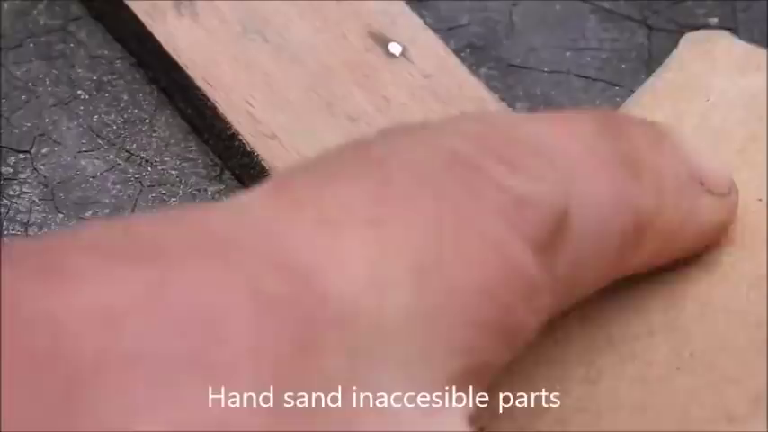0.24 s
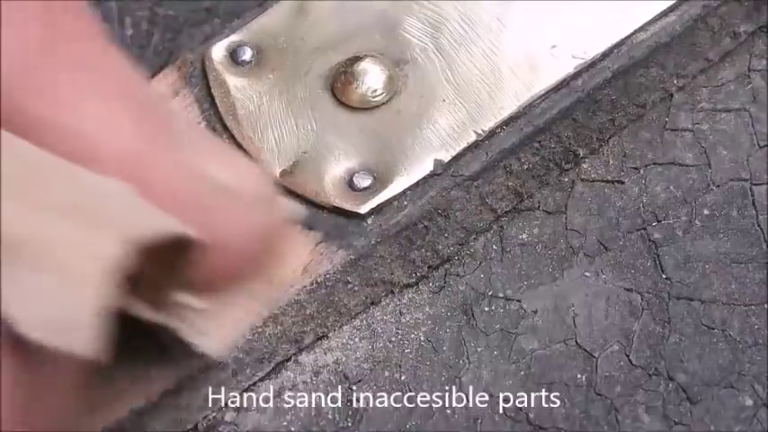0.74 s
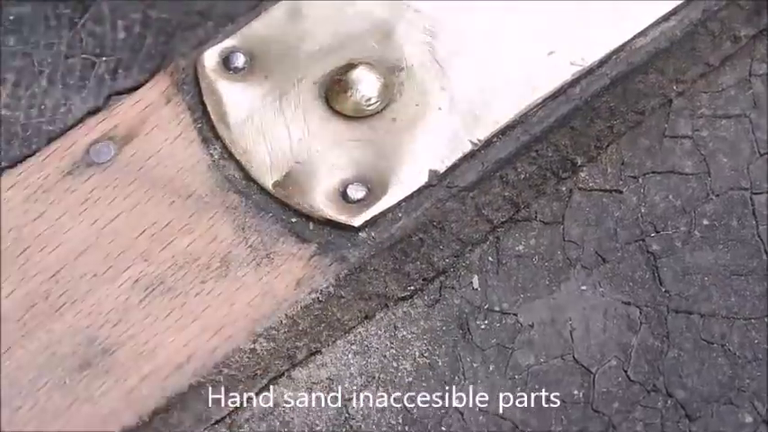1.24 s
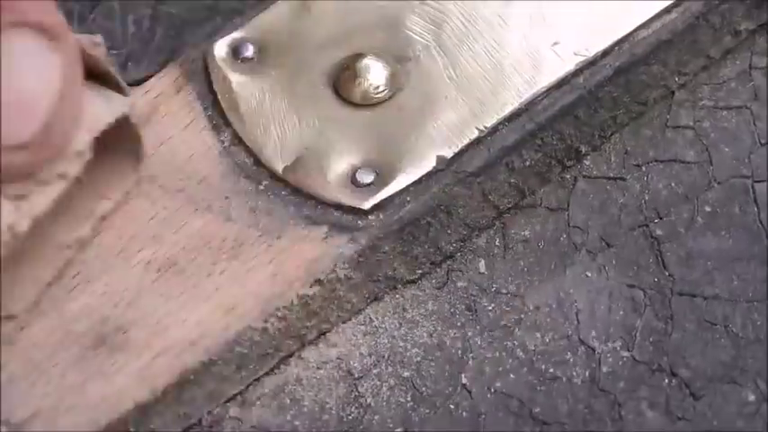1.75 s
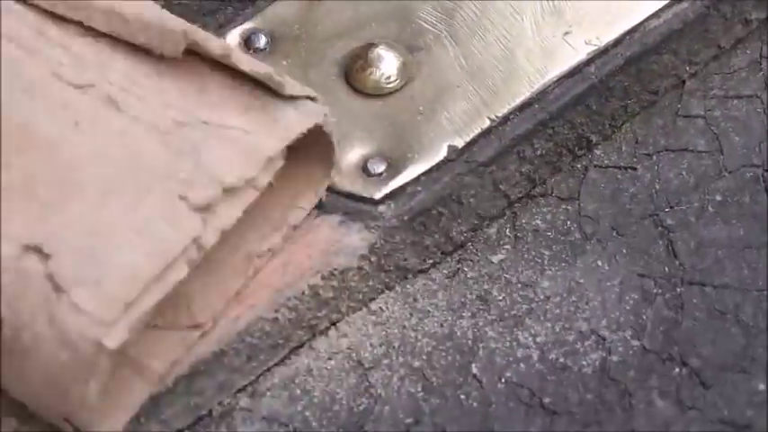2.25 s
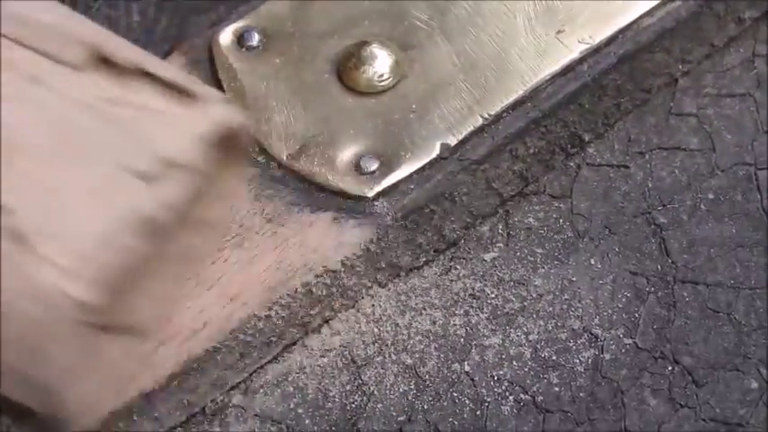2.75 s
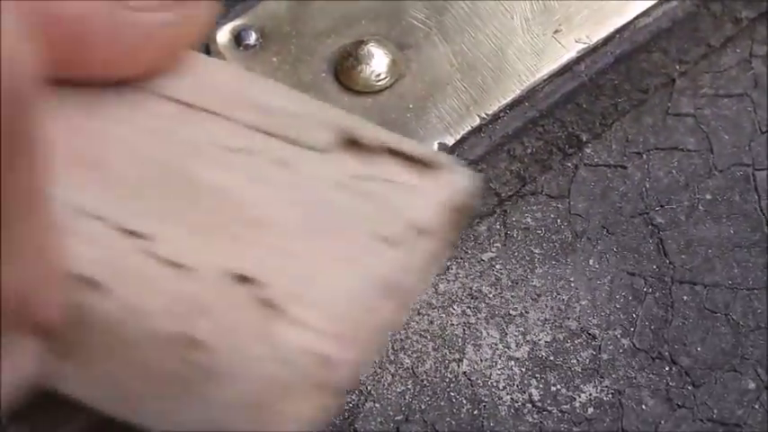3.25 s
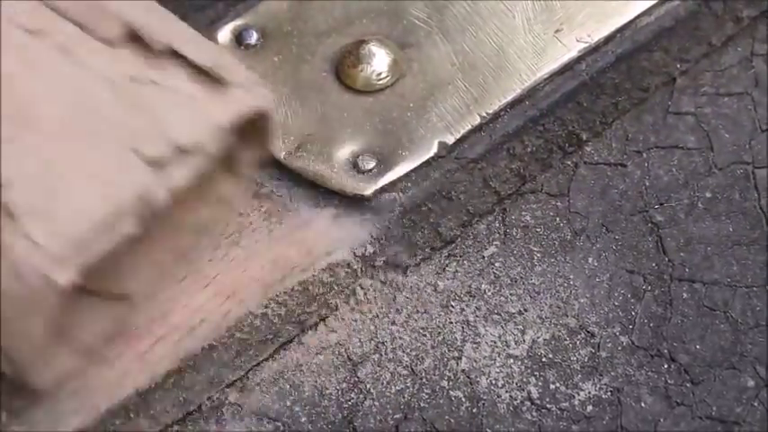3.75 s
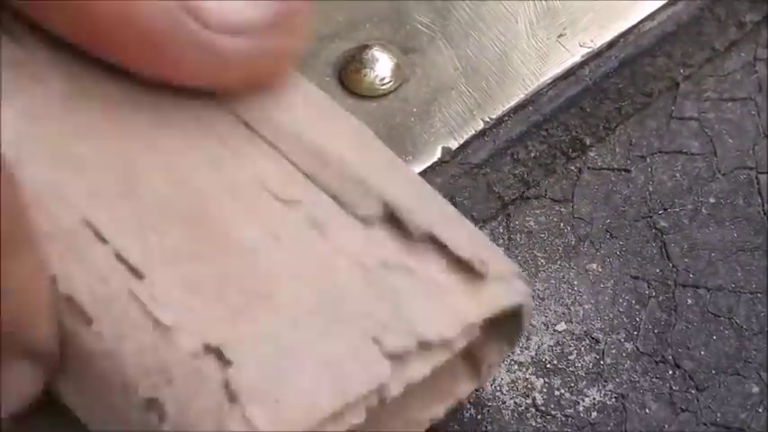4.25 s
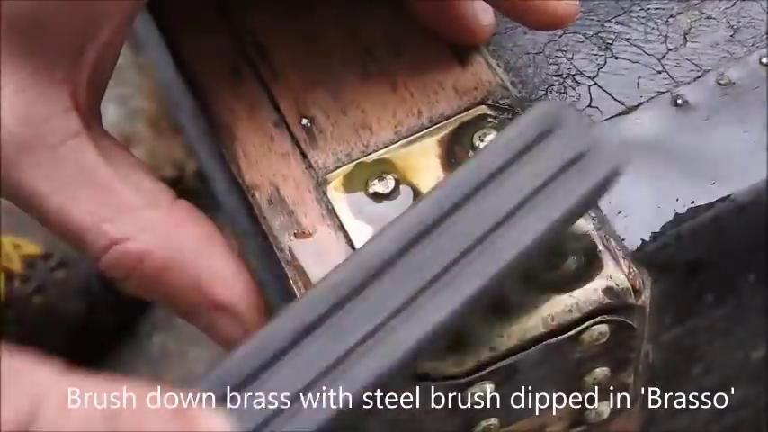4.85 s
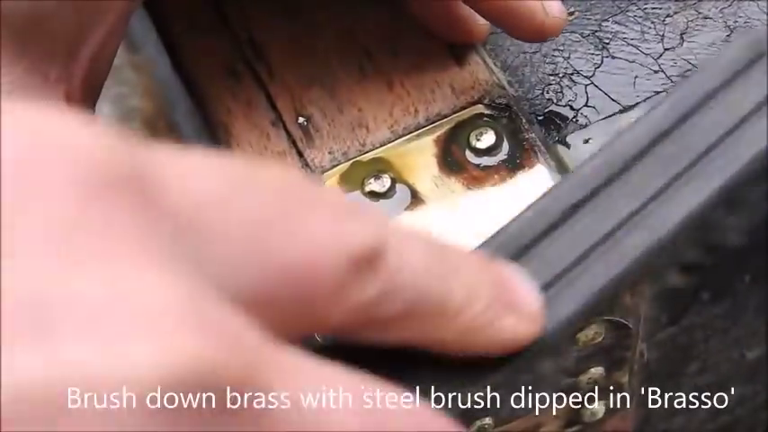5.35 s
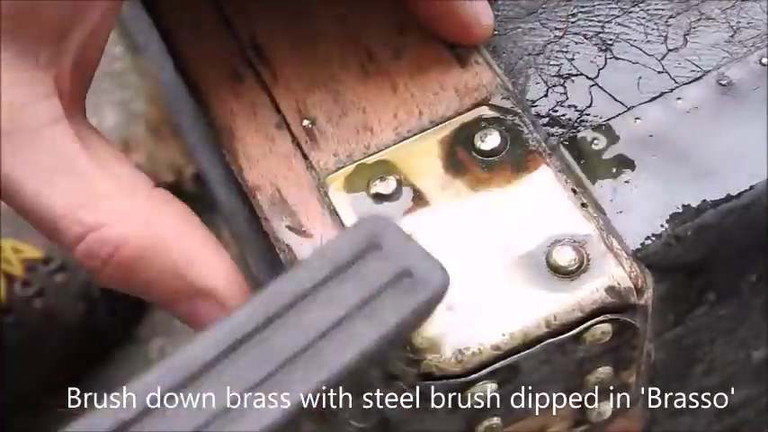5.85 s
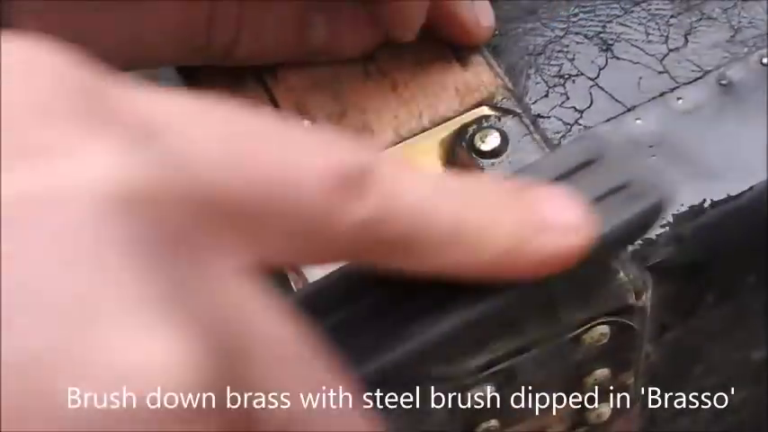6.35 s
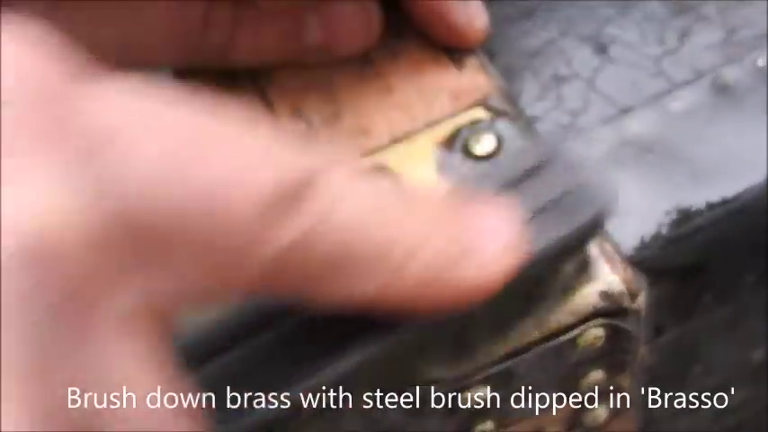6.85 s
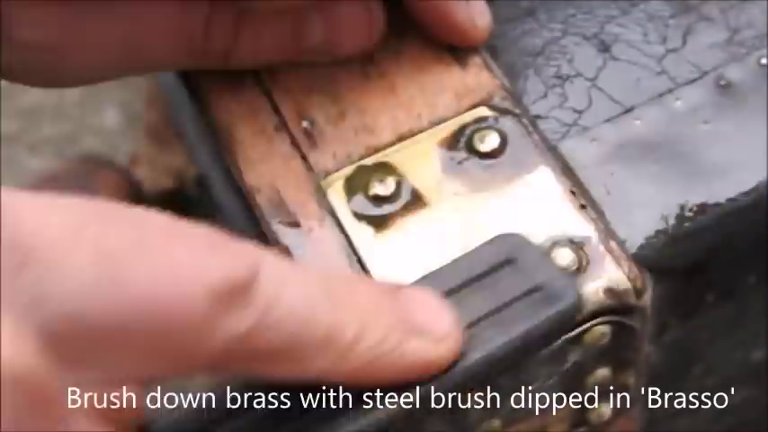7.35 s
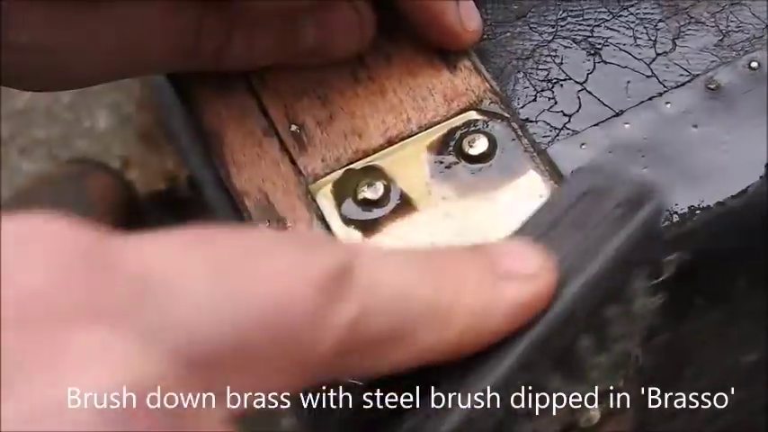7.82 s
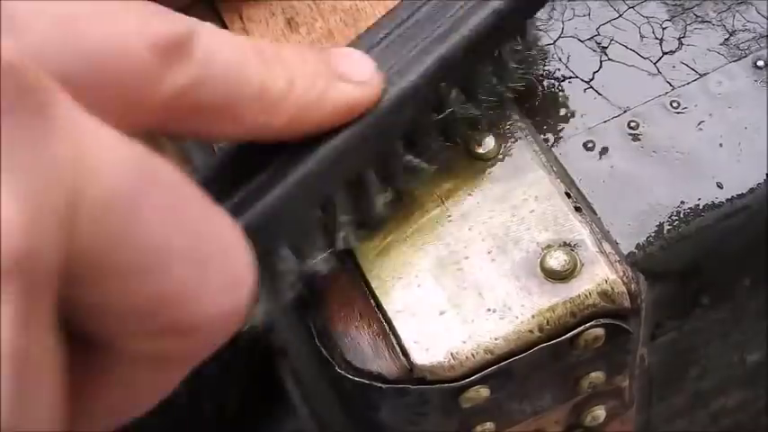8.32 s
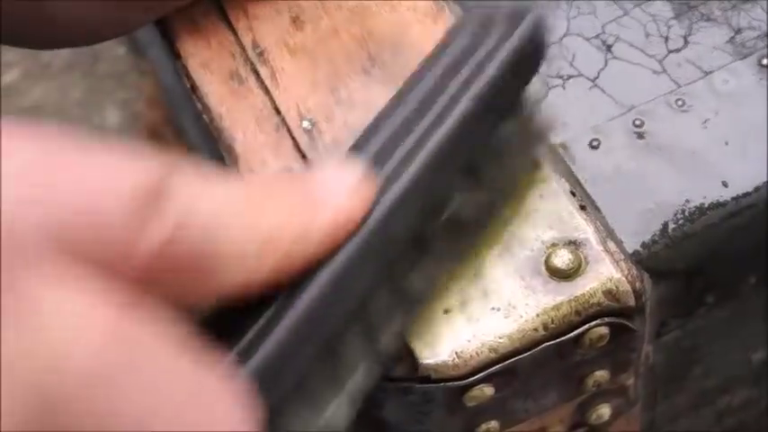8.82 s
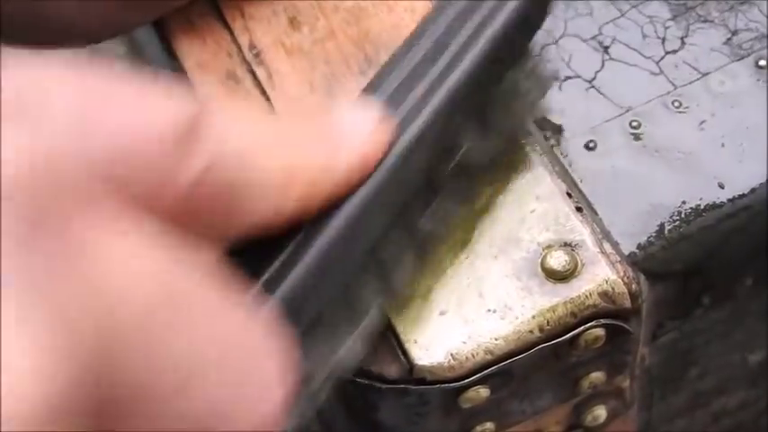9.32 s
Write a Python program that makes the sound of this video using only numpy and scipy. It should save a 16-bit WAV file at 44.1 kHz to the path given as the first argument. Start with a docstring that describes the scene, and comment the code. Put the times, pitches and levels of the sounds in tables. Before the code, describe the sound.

Close, dry, hurried sanding on wood and along a brass plate, with knocks and short pauses, gives way to softer, rapid wire-brush scrubbing.

```python
"""On a hollow wooden trunk with brass fittings, heard from close by, a hand makes very quick strokes: first with
folded sandpaper on a slat and along a brass plate, then with a wet wire brush over the brass.
Noise from countless sliding contacts follows the speed of each stroke and weakens towards the turn; the drag and
the jerk of setting off drive the wooden box as a set of resonances. The tool knocks on the trunk, the plastic back
of the brush raps on its edge, bristles squeak briefly on the brass, and a faint room tone lies beneath."""
import sys
import numpy as np
from scipy import signal
from scipy.fft import rfft, irfft, next_fast_len
from scipy.io import wavfile
from scipy.ndimage import uniform_filter1d

SR = 44100
rng = np.random.default_rng(int(sys.argv[2]) if len(sys.argv) > 2 else 0)


def generate_wav(sig):
    """Save sig (samples, or channels by samples) to the path in sys.argv[1] as 16-bit PCM at SR."""
    pcm = np.round(np.clip(np.atleast_2d(sig).T, -1, 1) * 32767).astype(np.int16)
    wavfile.write(sys.argv[1], SR, pcm)


def field_ratio(decibels):
    """Amplitude ratio for a level in dB (20 dB per decade); scalars and array-likes work."""
    return 10 ** (np.asarray(decibels, dtype=float) / 20)


N = 422474   # samples
TIME = np.arange(N) / SR   # s
PAD = next_fast_len(N + SR // 4)   # transform length with room for ringing
HZ = np.maximum(np.arange(PAD // 2 + 1) * SR / PAD, 1)

# Places worked on. Each row: start in seconds, hiss left at the turn in dB, peakedness of the hiss over a stroke
# (exponent), jerk at the start of a stroke in dB, brightening with effort in dB per dB and octave, base level of a
# flick late in the stroke in dB.
SPOTS = [(0, -33, 0.33, -7, 0.37, -25), (0.774, -12, 1.8, 0, .0, -16), (1.6, -21, 0.36, -4.5, 0, -17),
         (2.452, -50, 0.67, -12, 0.99, -25), (4.622, -4, 1.7, 0, 0.16, -20),
         (5.6, -2.5, 0.59, -7, 0.03, -29), (6.093, -4.5, 0.77, 1, 0.7, 4),
         (8.301, -11, 0.53, -5, 0.53, -26)]
# The tool bumping the trunk. Each row: time in seconds, strength of the blow in dB, strength of its treble tick
# in dB, frequency around which the modes answer most in Hz.
KNOCKS = [(0.042, -30, -55, 400), (0.121, -28, -55, 465), (0.201, -26, -55, 380), (0.281, -24, -55, 460),
          (0.361, -25.5, -55, 450), (0.442, -20.5, -50, 460), (0.519, -26, -52, 460),
          (0.596, -25, -55, 424), (0.672, -20.5, -52, 450), (0.747, -32.5, -52, 410),
          (0.806, -21, -52, 830), (0.821, -15.5, -45, 1440), (0.872, -33, -49, 1300),
          (0.888, -26, -48, 1010), (0.939, -19.5, -47, 815), (0.956, -21, -43, 815),
          (1.003, -16.5, -42, 800), (1.020, -11, -45, 1440), (1.065, -18, -40, 800),
          (1.076, -27, -43, 2500), (1.081, -16, -47, 1420), (1.127, -24, -41, 950),
          (1.139, -15.5, -36, 1300), (1.188, -28, -47, 700), (1.202, -13, -31, 900), (1.301, -27, -47, 500),
          (1.306, -15.5, -45, 450), (1.310, -24, -37, 1800), (1.348, -23, -41, 750),
          (1.357, -29, -37, 1800), (1.385, -29, -47, 1390), (1.400, -29, -49, 1900),
          (1.408, -23.5, -50, 726), (1.416, -24.5, -46, 794), (1.587, -49, -55, 1500),
          (2.031, -21, -52, 300), (2.098, -23, -40, 300), (2.174, -29, -45, 770), (2.36, -31.5, -44, 775),
          (2.377, -38, -48, 825), (2.463, -31, -43, 770), (2.877, -31, -45, 300), (3.288, -19, -47, 302)]


def at_hz(points):
    """Interpolation on a logarithmic frequency axis: a (Hz, value) table read at every bin."""
    hz, value = np.transpose(points)
    return np.interp(np.log(HZ), np.log(hz), value)


def coloured(mid, side, spectrum, likeness, low_hz, high_hz):
    """Spectral shaping and partial coherence: two noises become left and right; white ones get band rms near 1."""
    # Left over right. Each row: frequency in Hz, difference in dB.
    lean_points = [(2000, -1), (8500, -3.5), (14000, -1.5)]
    gain = field_ratio(at_hz(spectrum))
    in_band = (HZ > low_hz) & (HZ < high_hz)
    gain = gain / np.sqrt(np.sum(gain[in_band] ** 2) / len(HZ))
    alike = np.clip(at_hz(likeness), 0, 1)
    lean = field_ratio(at_hz(lean_points) / 2)
    mid = rfft(mid, PAD)
    side = rfft(side, PAD) * np.sqrt((1 - alike) / (1 + alike))
    left_right = np.array([(mid + side) * lean, (mid - side) / lean])
    return irfft(gain * left_right, PAD)[:, :N]


def resonate(x, hz, width_hz):
    """Damped oscillator: a two-pole resonance with gain near 1 on top."""
    r = np.exp(-np.pi * width_hz / SR)
    feedback = [1, -2 * r * np.cos(2 * np.pi * hz / SR), r * r]
    return signal.lfilter((1 - r * r) / 2 * np.array([1, 0, -1]), feedback, x)


def flutter(rate_hz):
    """Low-passed random process: noise smoothed by two equal poles at this rate, scaled to standard deviation 1."""
    r = np.exp(-2 * np.pi * rate_hz / SR)
    slow = signal.lfilter([1], [1, -2 * r, r * r], rng.standard_normal(N + SR))[SR:]
    return slow / slow.std()


def impulses(times_s, heights):
    """Point excitation: single-sample clicks at these times."""
    clicks = np.zeros(N)
    clicks[np.round(np.asarray(times_s) * SR).astype(int)] = heights
    return clicks


def fading(x, time_s):
    """Exponential relaxation: one pole turns a click into a dying push."""
    return signal.lfilter([1], [1, -np.exp(-1 / (time_s * SR))], x)


def rippled(x):
    """High modal density: many small resonances of tool and plate, as fixed random ripple; returns a spectrum."""
    spacing_hz, depth_db = 132, 1.1
    span = int(spacing_hz * PAD / SR)
    ripple = rng.standard_normal(len(HZ))
    for _ in range(2):
        ripple = uniform_filter1d(ripple, size=span)
    keep_power_db = depth_db ** 2 * np.log(10) / 20
    return rfft(x, PAD) * field_ratio(depth_db * ripple / ripple.std() - keep_power_db)


def strokes():
    """Reciprocating motion: one row per stroke of start s, hiss dB, box dB, extra jerk dB, lateness of its peak."""
    # Bouts of steady push and pull, four with paper, then four with the brush. Each row of a bout, one for every
    # third push: start in seconds, mean hiss level in dB, mean box level in dB.
    bouts = [
        [(-.042, -30, -39), (.194, -26.5, -38.5), (.435, -27.5, -39), (.665, -28.5, -43), (.89, -36.5, -54)],
        [(.803, -39.5, -48), (1.0, -39, -42), (1.187, -37, -43), (1.372, -40, -47)],
        [(1.665, -34.5, -44.5), (1.887, -35, -47), (2.093, -38, -45.5), (2.305, -32.5, -49.5)],
        [(2.458, -33, -45.5), (2.665, -35.5, -46), (2.87, -31, -45), (3.07, -34.5, -44.5),
         (3.274, -32.5, -44.5), (3.474, -40, -45.5), (3.677, -37, -48.5), (3.874, -36, -47.5),
         (4.075, -37, -47.5), (4.289, -35.5, -47), (4.495, -33, -47.5), (4.705, -35.5, -56)],
        [(4.669, -42.5, -52.5), (4.866, -43, -49.5), (5.063, -41.5, -51), (5.265, -42.5, -48),
         (5.463, -41, -49), (5.661, -42.5, -49.5), (5.858, -37.5, -46), (6.06, -46, -46)],
        [(6.274, -48, -49.5), (6.475, -44.5, -48.5), (6.676, -42.5, -53), (6.872, -44, -50), (7.07, -48, -48.5)],
        [(7.098, -42.5, -51.5), (7.289, -43.5, -50), (7.491, -47, -50), (7.695, -47, -49.5),
         (7.906, -46.5, -52), (8.113, -43.5, -53), (8.324, -44, -54)],
        [(8.3, -41.5, -49.5), (8.499, -38.5, -54), (8.707, -38.5, -50.5), (8.919, -38, -50.5),
         (9.128, -36, -50.5), (9.349, -37, -52), (9.566, -36.5, -50.5)],
    ]
    pushes_per_row = 3
    # Manner of each bout. Each row: share of the cycle taken by the push (fraction), push over pull in hiss in dB,
    # in box in dB, in jerk in dB, in lateness of the peak (log of an exponent).
    manner = [(.51, 1, 3, 2, 0.44), (0.51, 1.5, 20.5, -23, 0.76), (.51, 1.5, 4, 10, 0.65),
              (.52, 1.5, 5.5, 17, 0.53), (.57, 5.5, 1.5, -2, 0.67), (0.69, 3, -1.5, -0.5, 0.19),
              (.54, 1.5, 3.5, -10, .2), (.51, 1.7, 1.5, -5, 0.67)]
    # Strokes of altered contact, mostly barely touching. Each row: a time within the stroke in seconds, hiss lost
    # in dB, box lost in dB (a negative loss is a gain).
    falters = [(1.23, 10, 10), (2.25, 15, 1), (2.545, 5, 2), (3.42, -2.5, 0.5), (3.56, 4.5, -0.5),
               (3.595, 16, 6), (7.475, 5.5, 1)]
    # Single movements between bouts: lifting, shifting, setting down; each lasts until the next movement.
    # Each row: start in seconds, hiss level in dB, box level in dB.
    strays = [(1.244, -48.5, -65), (1.301, -65, -36.5), (1.334, -76, -53), (1.379, -56, -43.5),
              (1.4, -43.5, -41), (1.431, -54, -65), (1.506, -59, -65), (1.562, -45.5, -67),
              (1.608, -34, -44.5), (1.628, -37, -46), (2.28, -46.5, -57.5), (2.322, -61, -67),
              (2.351, -51, -55), (2.391, -59, -60.5), (4.633, -46, -49.5), (5.925, -83, -59.5),
              (6.096, -52.5, -56.5), (6.216, -59, -59.5), (7.002, -52, -53.5), (7.033, -72, -61),
              (7.073, -50.5, -59)]
    hiss_spread_db, box_spread_db = 0.8, 1.5   # from stroke to stroke
    rows = [np.pad(strays, [(0, 0), (0, 2)])]
    begins = np.sort([row[0] for row in strays] + [bout[0][0] for bout in bouts] + [N / SR])
    for bout, (share, *more_db) in zip(bouts, manner):
        cycles = np.arange(pushes_per_row * (len(bout) - 1) + 1)
        moments = np.sort(np.append(cycles, cycles + share))   # pushes and pulls alternate
        columns = [np.interp(moments, cycles[::pushes_per_row], column) for column in np.transpose(bout)]
        made = np.transpose(columns + 2 * [0 * moments])
        made[-1, 0] += share * (made[-2, 0] - made[-4, 0])   # the last pull lies past the table
        made[:, 1:] += np.outer((-1) ** np.arange(len(made)) / 2, more_db)
        made[:, 1:3] += rng.standard_normal((len(made), 2)) * [hiss_spread_db, box_spread_db]
        next_movement = begins[begins > bout[0][0]][0]
        rows.append(made[made[:, 0] < next_movement - 0.01])   # a bout runs until the next movement begins
    rows = np.vstack(rows)
    rows = rows[np.argsort(rows[:, 0])]
    for s, *lost_db in falters:
        rows[np.searchsorted(rows[:, 0], s) - 1, 1:3] -= lost_db
    return rows


def hand(made):
    """Kinematics of the hand: for every sample the warped progress through its stroke (0-1), hiss dB, box dB, place."""
    start, hiss_db, box_db, _, late = made.T
    length = np.diff(start, append=2 * start[-1] - start[-2])
    k = np.clip(np.searchsorted(start, TIME, "right") - 1, 0, None)
    place = np.searchsorted(np.array(SPOTS)[1:, 0], TIME, "right")
    through = np.clip((TIME - start[k]) / length[k], 0, 1) ** np.exp(late[k])
    return through, hiss_db[k], box_db[k], place


def room_tone():
    """Diffuse background noise: coloured noise with frequency-dependent coherence and a slow random swell."""
    # Each row: frequency in Hz, relative spectral density in dB per Hz.
    room_colour = [(15, -51), (25, -22), (460, -14.5), (555, -14), (746, -6.5), (1090, -26.5), (15700, -17)]
    # Each row: frequency in Hz, left-right likeness (0-1).
    room_likeness = [(60, 1), (170, 0.81), (400, 1), (1500, 0.5), (4000, 0.1), (13000, 0.41)]
    level_db = -56.5 + 2.0 * flutter(4.0)
    noise = rng.standard_normal((2, N))
    return field_ratio(level_db) * coloured(*noise, room_colour, room_likeness, low_hz=20, high_hz=16000)


def squeaks():
    """Narrow-band resonance: wire bristles sing on the brass as wavering tones that swell and fade."""
    # Each row: start in seconds, end in seconds, frequency in Hz, rms level at the height of the swell in dB.
    sung = [(5.659, 5.712, 9360, -36.5), (5.725, 5.88, 7860, -44)]
    width_hz = 60
    out = np.zeros(N)
    for begin, end, hz, level_db in sung:
        tone = rng.standard_normal(N)
        for _ in range(2):
            tone = resonate(tone, hz, width_hz)
        swell = np.sin(np.pi * np.clip((TIME - begin) / (end - begin), 0, 1))
        out += field_ratio(level_db) * tone / tone.std() * swell
    return out


def raps():
    """Free vibration after impact: the plastic brush back bounces on the trunk's edge and its modes ring; mid, side."""
    # Bounces. Each row: time in seconds, strength in dB, hardness as tilt in dB per octave about 900 Hz.
    bounces = [(6.0884, -31.5, 0), (6.0914, -22.5, 2), (6.097, -27.5, 5.5), (6.105, -30.5, -2.5)]
    # Edge modes. Each row: frequency in Hz, relative level in dB, time to decay by 60 dB in seconds.
    edge_modes = [(281, -7.5, 0.11), (424, -4.5, 0.11), (520, -12, 0.081), (632, -6.5, 0.032),
                  (810, -1, 0.035), (1030, -11, 0.024), (1200, -6, 0.03), (1550, -10, 0.035),
                  (2010, -19, 0.025), (2410, -11.5, 0.021), (2880, -28, 0.014), (3900, -28, .015)]
    lag_cycles, spread_db, side_db = 0.82, 5.0, -16   # the lag makes low modes answer later
    s, strength_db, tilt_db = np.transpose(bounces)
    out = np.zeros((2, N))
    for k, (hz, level_db, t60_s) in enumerate(edge_modes):
        height_db = strength_db + level_db + tilt_db * np.log2(hz / 900) + rng.normal(0, spread_db, len(s))
        clicks = impulses(s + lag_cycles / hz, field_ratio(height_db))
        r = field_ratio(-60 / (t60_s * SR))
        w = 2 * np.pi * hz / SR
        ringing = signal.lfilter([0, np.sin(w)], [1, -2 * r * np.cos(w), r * r], clicks + 1e-18)
        out += ringing * [[(-1) ** k], [field_ratio(side_db)]]
    return signal.sosfilt(signal.butter(3, 200, "high", fs=SR, output="sos"), out)   # no bass is radiated


def trunk(made, through, box_db, place):
    """Modal superposition: rough drag, jerk and judder as a stroke sets off, and knocks drive one set of modes; mid, side."""
    # Modes of the trunk. Each row: frequency in Hz, width in Hz, then the relative level in dB when driven at the
    # slat, at the plate edge, beside the plate, through the brush held flat, through the brush held aslant.
    box_modes = [(222, 30, -47, -16, -15, -40, -40), (293.8, 18.3, -4.5, 4.5, 0, 7.5, 8.5),
                 (383.4, 40, -1.5, 0.5, -6, -7, -6.5), (450, 44, 1.5, 2.5, -14, 0.5, -1.5),
                 (547, 107, -6, -2.5, -9.5, -8.5, -7.5), (630.5, 25, -9, -8, -4.5, 3, -3),
                 (723, 36, -5.5, -8, -10, -2, -8), (809, 53.4, -11, 6, -2, 2.5, -3),
                 (889, 96, -10, 3, -12, -6, -9), (986, 39, -9, -2.5, -5, -14, -11),
                 (1285, 210, -12, -1.5, -14, -11.5, -11), (1419, 61, -14, 4.5, -3.5, -10, -6.5),
                 (1517, 102, -14, -7, -44, -12, -8), (1930, 120, -26, 0.5, -11, -17, -13),
                 (2580, 1100, -22.5, -10.5, -30, -17, -13)]
    # For each place: driving point (index of those five levels).
    driving_point = np.array([0, 1, 2, 2, 3, 3, 4, 4])
    # For each place: extra loading of the low modes in dB.
    weight_db = [0.5, -0.5, 5, 3, -0.5, -2, -3.3, 0.5]
    springy_hz = 500   # below it, wires keep shaking the modes at the turn
    jerk_at_s, jerk_s, judder_s, blow_s = 0.00501, 0.00044, 0.00032, 0.0001   # delay into the stroke, decays
    jerk_spread_db, blow_spread_db, side_db = 3.5, 1.6, -15
    blow_lag_cycles = 0.26   # low modes answer a knock later
    focus_db = 16   # loss one octave from a knock's centre, growing with the square

    column = np.array(driving_point)[place]
    brush = column >= 3
    speed = np.sin(np.pi * through)
    inside = (made[:, 0] > 0) & (made[:, 0] < TIME[-1] - jerk_at_s)
    start, _, stroke_db, more_db, _ = made[inside].T
    jerk = field_ratio(stroke_db + more_db + np.array(SPOTS)[place[(start * SR).astype(int)], 3])
    judder = fading(impulses(start + jerk_at_s, jerk), judder_s)
    noise = rng.standard_normal((2, 2, N)) * field_ratio([[0], [side_db]])
    s, strength_db, _, centre_hz = np.transpose(KNOCKS)
    modes = np.array(box_modes)
    power = np.pi * modes[:, 1] / SR @ field_ratio(2 * modes[:, 2:])   # what unit noise gives at each driving point
    out = 0
    for k, mode in enumerate(modes):
        hz, width_hz = mode[:2]
        low = hz < springy_hz
        wires = 0.58 * (1.6 + speed) if low else 1.074 * (0.51 + speed ** 2)
        paper = 0.33 + speed
        drag = np.where(brush, wires, paper) * field_ratio(box_db) + judder
        jerks = impulses(start + jerk_at_s, jerk * field_ratio(rng.normal(0, jerk_spread_db, len(start))))
        # every blow lands with new strengths per mode
        off_centre_db = focus_db * np.log2(hz / centre_hz) ** 2
        blow_db = strength_db - off_centre_db + rng.normal(0, blow_spread_db, len(s))
        blows = impulses(s + blow_lag_cycles / hz, field_ratio(blow_db))
        blows = fading(blows / np.sqrt(width_hz / np.median(modes[:, 1])), blow_s)
        coupling = (field_ratio(mode[2:]) / np.sqrt(power))[column]
        force = drag * noise[k % 2] * field_ratio(3.47 * flutter(22.7))   # the drag wanders between the modes
        force[0] += 3.4 * fading(jerks, jerk_s)
        force *= coupling * field_ratio(low * np.array(weight_db))[place]
        # the sign cancels the one below in mid: a blow starts all modes the same way
        force += [[2.27 * (-1) ** k], [1.1 * field_ratio(side_db)]] * blows * coupling
        out = out + (-1) ** k * resonate(force, hz, width_hz)
    return signal.sosfilt(signal.butter(3, [215, 4500], "band", fs=SR, output="sos"), out)   # panels radiate no bass


def hiss(through, hiss_db, place):
    """Friction noise: thousands of grit or wire contacts, held until the grip is overcome, then rising with speed."""
    # Colour at each place, shaped by paper, hand and brush back. Each row of a place: frequency in Hz, relative
    # spectral density in dB per Hz.
    colours = [
        [(1000, -25), (1700, -8.5), (2090, -4), (2510, -14.5), (3480, -8.5), (5000, -6.5), (6250, 1.5),
         (7600, -5), (9950, 0), (13500, -4), (15700, -8)],
        [(1000, -13), (1700, -8), (3500, 1), (6550, 3), (8660, -2.5), (10900, 2.5), (15700, 0.5)],
        [(1000, -20), (1700, -13), (2250, -8.5), (2730, 2), (3080, -6.5), (4270, -2), (6990, -5.5), (7820, -3),
         (10100, -0.5), (14800, -5.5), (15700, -7)],
        [(1000, -31), (1700, -24), (1950, -14.5), (2200, -15.5), (2500, -3), (2850, -7), (3150, -11.5),
         (3450, -6.5), (3780, -9.5), (5050, -5), (6930, -9.5), (7960, -4.5), (10900, -7), (11700, -12),
         (13800, -12.5), (15700, -18)],
        [(1000, -56), (1700, -32), (2920, -12), (3480, -12), (4190, -9), (4900, -15.5), (5640, -7),
         (6080, -8.5), (6730, -8.5), (7250, -1), (10200, -5.5), (10600, -5), (13300, -5.5), (14700, -2),
         (15700, -4)],
        [(1000, -49), (1700, -17.5), (1990, -15), (3420, -12), (3680, -9), (4690, -11), (9070, -1.5),
         (15700, -9)],
        [(1000, -29), (1700, -14.5), (2270, -19.5), (2510, -8.5), (3890, -5), (4190, 0), (4730, -9),
         (5750, 0.5), (6490, -4), (7120, 0), (8660, 3), (10500, -3.5), (11900, 1), (14700, -2.5), (15700, -1)],
        [(1000, -33), (1700, -18), (2540, -12), (2780, -28), (3110, -6), (3960, -7), (5640, -1), (6080, -4),
         (6490, -2), (8820, -3), (9410, 1), (10400, -9), (11300, -0.5), (13900, -4.5), (15700, -7)],
    ]
    # Each row: frequency in Hz, left-right likeness (0-1).
    likeness = [(130, 1), (300, 1), (2300, 0.92), (3500, 0.51), (7000, 0.7), (13000, 0.48)]
    # Single wires catching and snapping free. Each row: time in seconds, strength in dB.
    snaps = [(5.03, -40), (5.219, -43), (5.30, -41), (6.092, -36), (6.592, -33), (7.244, -30), (7.268, -34),
             (8.856, -41), (9.179, -29)]
    # For each place: extra brightening above 13 kHz with effort in dB per dB.
    sheen = [0.2, 0, 0.2, 0, .7, 0.3, 0, 0]
    uneven_db, grit_db, patchy_db = 0.98, 1.93, 2.5   # depth of the wobble, of single grains, of each band's flicker
    grip = 0.37   # share of the top speed below which nothing slides
    tick_s, snap_s = 0.0046, 0.0034   # decay times

    turn_db, peaked, brighter, flick_db = np.array(SPOTS)[place][:, [1, 2, 4, 5]].T
    sliding = np.clip((np.sin(np.pi * through ** 0.96) - grip) / (1 - grip), 0, 1)
    speed = field_ratio(turn_db) + sliding ** peaked
    harder_db = hiss_db - uniform_filter1d(hiss_db, size=6000)   # than the strokes around it
    over_edge = np.exp(-((through - 0.62) / 0.016) ** 2)   # a raised edge late in the stroke
    flick = field_ratio(flick_db + np.clip(harder_db, -9, 2.2)) * over_edge
    level = field_ratio(uniform_filter1d(hiss_db, size=200) + uneven_db * flutter(51)) * (speed + flick)
    effort_db = 20 * np.log10(level / np.sqrt(uniform_filter1d(level ** 2, size=6000)))
    effort_db = np.clip(effort_db, -9, 9)
    s, _, tick_db, _ = np.transpose(KNOCKS)
    level = level + fading(impulses(s, field_ratio(tick_db)), tick_s)   # a knock ticks in the treble too
    s, snap_db = np.transpose(snaps)
    level = level + fading(impulses(s, field_ratio(snap_db)), snap_s)

    grains = field_ratio(grit_db * (np.minimum(rng.exponential(1, N), 5) - 2.5))
    contacts = level * grains * rng.standard_normal((2, N))
    spectrum = 0
    for k, colour in enumerate(colours):
        here = contacts * (place == k)
        spectrum = spectrum + rippled(coloured(*here, colour, likeness, low_hz=4000, high_hz=15000))

    out, centres_hz = 0, np.geomspace(1500, 16000, num=30)
    for k, hz in enumerate(centres_hz):   # harder strokes differ in brightness, every band flickers on its own
        window = np.interp(np.log(HZ), np.log(centres_hz), np.arange(len(centres_hz)) == k)
        band = irfft(spectrum * window, PAD)[:, :N]
        tilt = brighter * np.log2(hz / 9000) + (hz > 13000) * np.array(sheen)[place]
        out = out + band * field_ratio(tilt * effort_db + patchy_db * flutter(40.0))
    return out


def scene():
    """Superposition of sources: the hiss spreads between the ears, the box sits almost in the middle."""
    made = strokes()
    through, hiss_db, box_db, place = hand(made)
    mid, side = trunk(made, through, box_db, place) + raps()
    side = signal.sosfilt(signal.butter(2, 2200, fs=SR, output="sos"), side)
    wood = mid + side * [[1], [-1]]
    return room_tone() + squeaks() + wood + hiss(through, hiss_db, place)


def top_cut(x):
    """Nothing passes above the cut-off."""
    return signal.sosfilt(signal.butter(12, 16530, fs=SR, output="sos"), x)


def record(dry):
    """Band limitation: a steep elliptic low-pass removes the top."""
    low_pass = signal.ellip(10, 0.5, 55, 15730, fs=SR, output="sos")   # order, ripple dB, stopband dB, edge Hz
    mix = signal.sosfilt(low_pass, dry)
    return top_cut(mix)


dry = scene()
out = record(dry)
generate_wav(out)
```